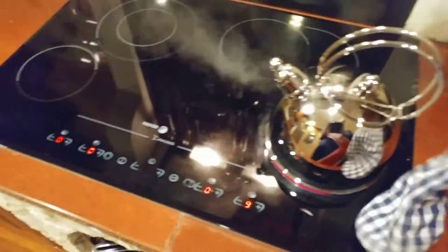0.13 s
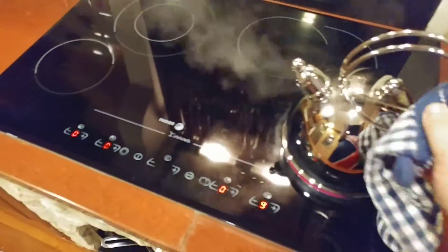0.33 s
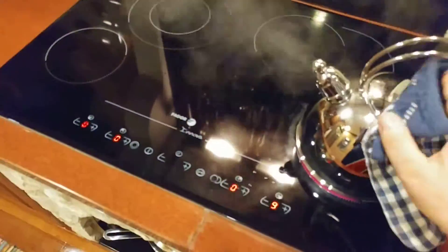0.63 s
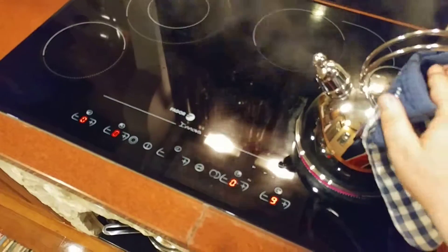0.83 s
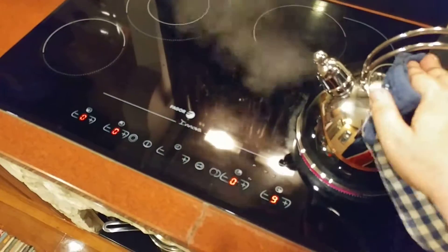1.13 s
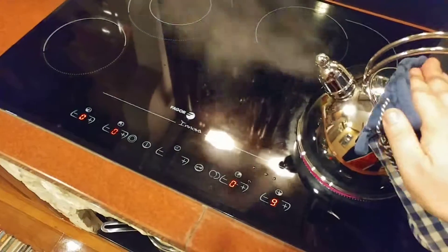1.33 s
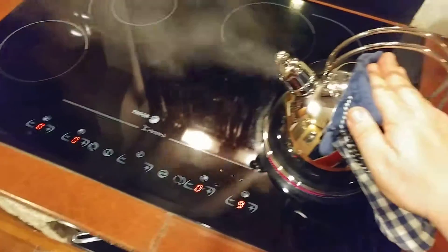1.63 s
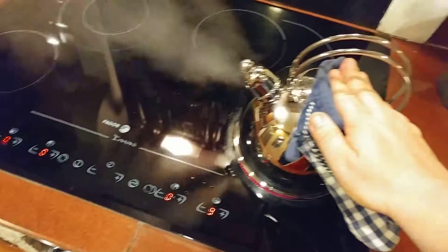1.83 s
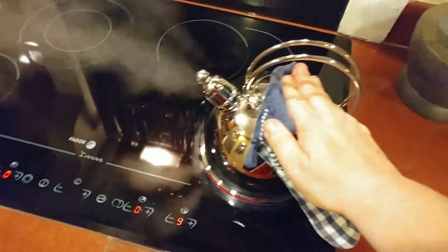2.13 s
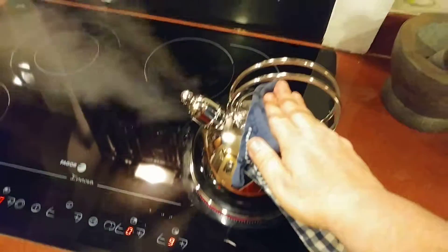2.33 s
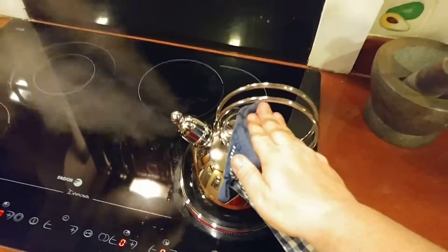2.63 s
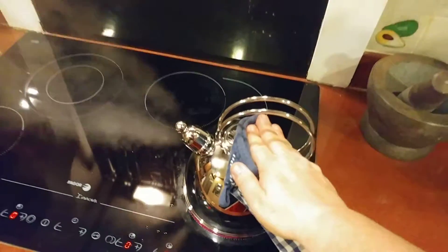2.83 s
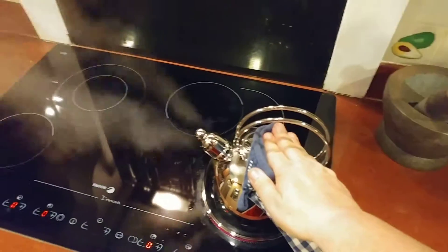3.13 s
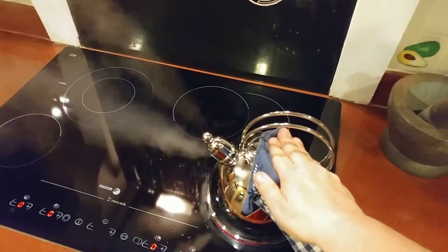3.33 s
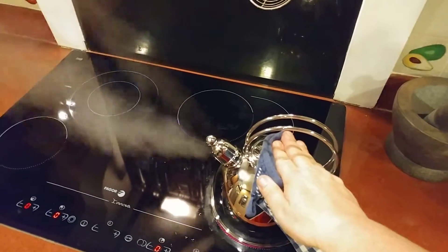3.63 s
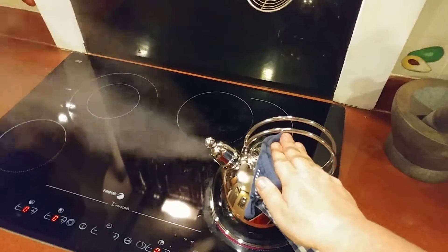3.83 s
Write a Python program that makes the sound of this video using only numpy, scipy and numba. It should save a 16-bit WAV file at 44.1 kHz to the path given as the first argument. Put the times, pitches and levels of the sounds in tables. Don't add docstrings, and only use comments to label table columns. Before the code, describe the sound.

Steel kettle whistling on a hob, close moving stereo microphone, hard-walled kitchen. Water rumbles and steam hisses under a weak breathy whistle; a cloth-covered hand knocks the lid, steam squeals, and a piercing tone swells, then sustains.

```python
import sys
import numpy as np
from scipy import signal
from scipy.fft import rfft, irfft
from scipy.io import wavfile
from scipy.ndimage import uniform_filter1d, minimum_filter1d, map_coordinates
from numba import njit

SR = 44100
rng = np.random.default_rng(int(sys.argv[2]) if len(sys.argv) > 2 else 0)


def voltage_ratio(decibels):
    exponent = np.asarray(decibels, float) / 20
    return 10 ** exponent


def log_audio(samples):
    frames = np.atleast_2d(samples).T
    limited = np.clip(frames, -1, 1)
    pcm = np.round(limited * 32767).astype(np.int16)
    wavfile.write(sys.argv[1], SR, pcm)


N = 176400

# frequency in Hz, likeness 0-1.
PORT_LIKENESS = [(60, 0.91), (250, 0.95), (600, 0.72), (1200, 0.24), (3000, 0.029), (12000, 0.046)]
# frequency in Hz, left over right in dB.
PORT_TILT = [(200, -1), (1500, 2), (4500, 0.5), (8000, -3), (14000, 32)]

# frequency in Hz, level in dB per Hz.
BOIL_SPECTRUM = [(28, -70), (48, -17), (90, -4), (250, -7.5), (550, -4), (950, -7.5), (1300, -16),
                 (1800, -80)]
# centre in Hz, width in Hz, height in dB.
BOIL_PEAKS = [(397, 49, 2.5), (947, 97, 4.5)]
# frequency in Hz, level in dB per Hz.
AIR_SPECTRUM = [(900, -9), (1200, -5), (2000, -3.5), (2600, -9), (4200, -11.5), (7700, -16), (11000, -28),
                (14000, -41.5), (16000, -68)]
# centre in Hz, width in Hz, height in dB.
AIR_PEAKS = [(7700, 1800, 10.5), (8950, 340, -15), (9970, 660, 8.5)]
# frequency in Hz, level in dB.
HOB_HUM = [
    (100, -38),
    (301, -43),
    (1635, -50),
]

# time in seconds, pitch in Hz, level in dB.
WEAK_WHISTLE = [(0, 3340, -24), (.04, 3300, -25), (.05, 3295, -32), (.075, 3335, -25), (.14, 3270, -23),
                (.18, 3290, -29), (.2, 3325, -25), (.28, 3305, -31), (.3, 3315, -44), (.32, 3335, -31),
                (.385, 3310, -31), (.41, 3340, -24), (.44, 3285, -30), (.63, 3260, -33), (.72, 3300, -24),
                (.81, 3345, -31), (.88, 3315, -27), (.9, 3320, -35), (.915, 3275, -27), (.962, 3370, -28),
                (.98, 3390, -42), (1.05, 3525, -35), (1.1, 3460, -36), (1.16, 3450, -34)]
# time in seconds, level in dB against the weak whistle.
WEAK_OCTAVE = [(0, -22), (.6, -12), (.68, -9), (.96, -7.5), (1.0, -35)]

# time in seconds, pitch in Hz, level in dB.
LID_SQUEALS = [
    [(.41, 8200, -35), (.446, 8220, -27), (.56, 8310, -33.5), (.6, 8190, -30.5), (.68, 7970, -36)],
    [(.985, 7680, -28), (1.04, 7520, -38), (1.08, 7620, -23.5), (1.15, 7786, -23), (1.172, 8320, -15),
     (1.2, 8600, -38)],
]
# start in
# seconds, end in seconds, from Hz, to Hz, width in Hz, level in dB.
BREATHY_TONES = [
    (1.35, 1.53, 7630, 7630, 110, -28),
    (1.31, 1.6, 8050, 8450, 100, -31),
    (1.245, 1.47, 9600, 9650, 160, -33),
    (1.24, 1.34, 10700, 10750, 200, -38),
    (1.38, 1.52, 10900, 11050, 200, -39),
    (1.19, 1.36, 12950, 13600, 350, -35),
    (1.0, 1.09, 9050, 9450, 200, -39),
    (-1, 1.6, 555, 555, 35, -31),
]
# frequency in Hz, level in dB per Hz.
SEAL_SPECTRUM = [(8800, -50), (9400, 0), (10900, -2), (11800, -25), (14300, -25), (15200, -20)]

# time in seconds, level in dB.
JET_STRENGTH = [(0, -70), (.96, -53), (1.0, -35), (1.16, -37), (1.26, -27), (1.5, -27.5), (1.62, -27.5),
                (2.1, -28), (2.3, -28), (3.3, -27), (4, -25)]
# frequency in Hz, level in dB per Hz.
JET_SPECTRUM = [(2500, -7.5), (4500, -11), (6500, -8), (8000, -1.5), (11000, -13.5), (13500, -28.5),
                (14500, -23.5), (16000, -48)]
# centre in Hz, width in Hz, height in dB.
JET_PEAKS = [(8300, 600, 4.5), (8950, 170, -5.5), (10000, 710, 4)]

# frequency in Hz, level in dB, 60 dB decay in seconds.
LID_MODES = [
    (726, 2, 0.022),
    (1880, -11, .05),
    (2000, 3, 0.01),
    (8500, -12, 0.02),
]

# time in seconds, pitch in Hz.
WHISTLE_PITCH = [(1.2, 2570), (1.235, 2603), (1.28, 2615), (1.335, 2695), (1.38, 2729), (1.45, 2756),
                 (1.489, 2740), (1.577, 2812), (1.686, 2832), (1.826, 2898), (1.886, 2893), (1.933, 2916),
                 (2.041, 2894), (2.083, 2937), (2.11, 2922), (2.27, 2954), (2.36, 2943), (2.402, 2912),
                 (2.452, 2945), (2.871, 2931), (2.894, 2948), (2.931, 2935), (3.103, 2950), (3.178, 2980),
                 (3.325, 2997), (3.54, 2958), (3.749, 2977), (3.787, 2956), (3.951, 2987)]
# time in seconds, level in dB.
SECOND_PARTIAL = [(1.2, -55), (1.3, -38), (1.53, -36), (1.56, -30), (1.73, -38.5), (1.82, -30), (2.27, -37),
                  (2.3, -29), (2.79, -22.5), (2.88, -29), (2.95, -22.5), (3.54, -35), (3.7, -33),
                  (4.0, -29)]
# multiple, lasting level in dB, early extra in dB,
# fading time in seconds, left over right in dB.
HIGH_PARTIALS = [
    (3, -44, 5, .6, 2),
    (4, -43, -9, .4, 3),
    (5, -90, 40, .6, -3),
]
# time in seconds, left level in dB, right level in dB.
STANDING_WAVES = [(1.2, -29, -26), (1.25, -18, -16), (1.305, -10, -10.5), (1.37, -4, -4), (1.45, -8, -5),
                  (1.55, -0.5, -4), (1.62, -1, -2), (1.714, -1.5, -3.5), (1.86, -5, 1.5), (2.0, -3, -2),
                  (2.11, -6, 0), (2.2, 3.5, 0.5), (2.35, -0.5, -5), (2.48, 0.5, -5), (2.7, 4, -4.5),
                  (2.9, 3.5, -2.5), (3.086, 2, -2.3), (3.245, 3, -1), (3.33, 3, -9.5), (3.445, 4, 1.7),
                  (3.7, 3.5, 0.5), (4, 5.5, 4.5)]
# time in seconds, phase by which left leads in radians.
LEFT_LEAD = [(1.235, -2.8), (1.252, -5.1), (1.285, -5.7), (1.31, -7.9), (1.337, -13.0), (1.377, -14.5),
             (1.482, -12.9), (1.512, -13.4), (1.532, -15.8), (1.547, -13.9), (1.589, -15.4), (1.664, -15.3),
             (1.674, -14.2), (1.729, -15.5), (1.744, -14.8), (1.781, -16.0), (1.789, -19.6), (1.811, -21.3),
             (1.849, -20.0), (1.916, -21.0), (1.941, -19.7), (2.018, -19.9), (2.026, -21.2), (2.078, -19.9),
             (2.096, -21.7), (2.103, -19.1), (2.125, -21.0), (2.14, -19.5), (2.17, -19.1), (2.36, -19.7),
             (2.42, -22.4), (2.432, -20.7), (2.452, -20.3), (2.5, -21.3), (2.58, -21.9), (2.66, -23.0),
             (2.704, -23.6), (2.717, -22.5), (2.8, -23.3), (3.126, -24.2), (3.183, -22.6), (3.225, -22.8),
             (3.24, -22.1), (3.3, -22.1), (3.328, -20.7), (3.343, -23.0), (3.535, -24.8), (3.759, -23.9),
             (3.847, -24.7), (3.951, -23.5)]
# time in seconds, echo share 0-1, spread in seconds.
NULLS_LEFT = [(1.27, .45, .005), (1.34, .8, .012), (1.39, .6, .008), (1.495, .65, .008), (1.539, .75, .005),
              (1.639, .6, .005), (1.669, .8, .003), (1.701, .5, .005), (1.786, .9, .004),
              (1.844, .75, .005), (1.933, .6, .004), (2.023, .6, .008), (2.098, .9, .006),
              (2.125, .4, .006), (3.14, .4, .008)]
# time in seconds, echo share 0-1, spread in seconds.
NULLS_RIGHT = [(1.225, .8, .006), (1.454, .65, .006), (1.514, .5, .009), (1.674, .6, .006),
               (2.043, .4, .005), (2.43, .8, .008), (2.485, .55, .005), (2.589, .35, .005),
               (2.712, .45, .005), (2.757, .5, .004), (3.335, .85, .011), (3.383, .4, .005)]


def unit(x):
    return x / np.sqrt(np.mean(x ** 2) + 1e-20)


def curves(rows):
    s, *cols = np.transpose(rows)
    return [np.interp(np.arange(N) / SR, s, c) for c in cols]


def gate(start, end, edge=0.0033):
    t = np.arange(N) / SR
    return np.clip(np.minimum(t - start, end - t) / edge, 0, 1)


def wobble(rate):
    knots = rng.standard_normal(int(N * rate / SR) + 4)
    return map_coordinates(knots, [np.arange(N) * rate / SR])


def along(points, hz):
    f, v = np.transpose(points)
    return np.interp(np.log(hz + 1), np.log(f + 1), v)


def rush(spectrum, peaks, patchy_db):
    z = signal.stft(rng.standard_normal((2, N)), nperseg=512)[2]
    field = uniform_filter1d(rng.standard_normal(z.shape[1:]), 6, 0)
    field = uniform_filter1d(field, 10, 1)
    pair = signal.istft(z * voltage_ratio(patchy_db * unit(field)), nperseg=512)[1][:, :N]
    hz = np.fft.rfftfreq(N, 1 / SR)
    db = along(spectrum, hz)
    for centre, width, height_db in peaks:
        db = db + height_db / (1 + (2 * (hz - centre) / width) ** 2)
    turn = np.arccos(np.clip(along(PORT_LIKENESS, hz), -1, 1)) / 2
    mid, side = rfft(pair) * voltage_ratio(db) * [np.cos(turn), np.sin(turn)]
    tilt = voltage_ratio(along(PORT_TILT, hz) / 2)
    return unit(irfft([(mid + side) * tilt, (mid - side) / tilt], N))


def boil():
    backing_db = 0.43 * np.clip(np.arange(N) / SR - 1.5, 0, None)
    level_db = -21.5 - backing_db + 0.42 * wobble(5.33)
    return voltage_ratio(level_db) * rush(BOIL_SPECTRUM, BOIL_PEAKS, patchy_db=1.0)


def air():
    return voltage_ratio(-30.5 + 0.4 * wobble(9.3)) * rush(AIR_SPECTRUM, AIR_PEAKS, patchy_db=2.0)


def hob_hum():
    t = np.arange(N) / SR
    out = np.zeros(N)
    for hz, db in HOB_HUM:
        level = voltage_ratio(db - 1.2 * t + 2.4 * wobble(8.27))
        out = out + np.sqrt(2) * level * np.sin(2 * np.pi * hz * t)
    return out


def airy(hz, db, jitter_hz, rough_db, pan_db, drift):
    phase = 2 * np.pi * np.cumsum(hz + jitter_hz * (wobble(25) + wobble(120))) / SR
    lead = drift * wobble(12) * np.array([[1], [-1]])
    flutter_db = rough_db * np.array([wobble(69.97), wobble(69.7)]) + pan_db * np.array([[.5], [-.5]])
    return np.sqrt(2) * voltage_ratio(db + flutter_db) * np.sin(phase + lead + [[0], [1.6]])


def breathy(hz, width_hz):
    swing = np.array([wobble(width_hz) + 1j * wobble(width_hz) for port in "LR"])
    return unit(np.real(swing * np.exp(2j * np.pi * np.cumsum(hz) / SR)))


def weak_whistle():
    hz, db = curves(WEAK_WHISTLE)
    under_db, = curves(WEAK_OCTAVE)
    tone = airy(hz, db + 2, jitter_hz=9.1, rough_db=2.9, pan_db=0.26, drift=0.37)
    breath = voltage_ratio(db - 4) * breathy(hz, 90)
    octave = airy(2 * hz, db + under_db, jitter_hz=27.3, rough_db=2.9, pan_db=-0.34, drift=0.16)
    return gate(-1, 1.175) * (tone + breath + octave)


def leak():
    out = np.zeros((2, N))
    for rows in LID_SQUEALS:
        squeal = airy(*curves(rows), jitter_hz=31.0, rough_db=4.6, pan_db=-3.5, drift=1.0)
        out = out + gate(rows[0][0], rows[-1][0]) * squeal
    for start, end, from_hz, to_hz, width_hz, db in BREATHY_TONES:
        hz, = curves([(start, from_hz), (end, to_hz)])
        out = out + gate(start, end, 0.016) * voltage_ratio(db) * breathy(hz, width_hz)
    sealing = gate(1.24, 1.55, .04) * voltage_ratio(-34)
    return out + sealing * rush(SEAL_SPECTRUM, [], patchy_db=-3.0)


def steam_jet():
    strength_db, = curves(JET_STRENGTH)
    puffs_db = 0.39 * wobble(11) + 0.63 * wobble(24.7) + 1.1 * wobble(300)
    return voltage_ratio(strength_db + 2.5 + puffs_db) * rush(JET_SPECTRUM, JET_PEAKS, patchy_db=1.8)


def hand():
    knock_s, thud_s, thud_hz, thud_length_s = .9775, 1.406, 85.4, 0.086
    t = np.arange(N) / SR
    since = np.clip(t - knock_s, 0, None)
    knock = np.zeros(N)
    for hz, db, t60 in LID_MODES:
        knock = knock + voltage_ratio(db - 60 * since / t60) * np.sin(2 * np.pi * hz * since)
    scuff = uniform_filter1d(rng.standard_normal(N), size=3)
    knock = knock + (t > knock_s) * 0.55 * voltage_ratio(-60 * since / 0.042) * scuff
    thud = np.exp(-((t - thud_s) / thud_length_s) ** 2) * np.sin(2 * np.pi * thud_hz * t)
    return voltage_ratio(-15) * knock + voltage_ratio(-19) * thud


def nulls(rows):
    t = np.arange(N) / SR
    gain = np.ones(N)
    for s, share, spread_s in rows:
        gain = gain * (1 - share * np.exp(-((t - s) / spread_s) ** 2 / 2))
    return gain


def whistle():
    (hz,), (lead,), (second_db,) = curves(WHISTLE_PITCH), curves(LEFT_LEAD), curves(SECOND_PARTIAL)
    age = np.clip(np.arange(N) / SR - 1.2, 0, None)
    young = np.exp(-age / 0.84)
    phase = 2 * np.pi * np.cumsum(hz + (3 + 3 * young) * wobble(30) + 6.6 * wobble(110)) / SR
    skirt = 1
    for rate, db in ((60, -22), (250, -21.5), (900, -30)):
        shake = np.array([0.6 * wobble(rate) + 1j * wobble(rate) for port in "LR"])
        skirt = skirt + voltage_ratio(db + 4.7 * young) * shake
    ports = voltage_ratio(curves(STANDING_WAVES)) * [nulls(NULLS_LEFT), nulls(NULLS_RIGHT)]
    ports = ports * np.exp(.5j * np.array([lead, -lead]))
    out = np.real(ports * skirt * np.exp(1j * phase))
    levels = [(2, second_db, -2.7)]
    for k, db, extra_db, fade_s, pan_db in HIGH_PARTIALS:
        levels.append((k, db + extra_db * np.exp(-age / fade_s), pan_db))
    for k, db, pan_db in levels:
        flutter_db = 2.2 * np.array([wobble(18), wobble(18)]) + pan_db * np.array([[.5], [-.5]])
        drift = .45 * np.array([wobble(6), wobble(6)])
        rough = .2 * (2.4 if k == 2 else k) * young * wobble(300)
        out = out + voltage_ratio(db + flutter_db) * np.sin(k * phase + drift + rough)
    return np.sqrt(2) * out * gate(1.19, 5)


def kitchen(x):
    t60_s = .4
    t = np.arange(SR // 2) / SR
    tail = rng.standard_normal((2, len(t))) * voltage_ratio(-60 * t / t60_s) * (t > .004)
    return signal.fftconvolve(x, tail / np.linalg.norm(tail[0]), axes=1)[:, :N]


def scene():
    background = boil() + air() + hob_hum()
    near = weak_whistle() + leak() + hand()
    loud = whistle()
    room = kitchen(voltage_ratio(-14) * near + voltage_ratio(-26) * loud)
    return loud + near + room + steam_jet() + background


@njit
def recover(need, step):
    gain = need.copy()
    for n in range(1, need.shape[1]):
        gain[:, n] = np.minimum(need[:, n], gain[:, n - 1] + step * (1 - gain[:, n - 1]))
    return gain


def band_limit(x):
    return signal.sosfilt(signal.butter(12, 15670, fs=SR, output="sos"), x)


def record(dry):
    ceiling, release_s = .935, .025
    need = np.minimum(1, ceiling / (np.abs(dry) + 1e-9))
    need = minimum_filter1d(need, size=177, axis=1)
    gain = uniform_filter1d(recover(need, 1 / (release_s * SR)), size=89, axis=1)
    return band_limit(dry * gain)


dry = scene()
out = record(dry)
log_audio(out)
```